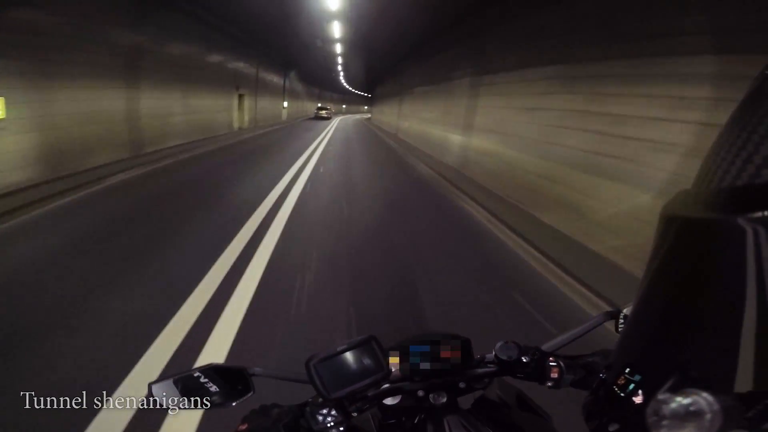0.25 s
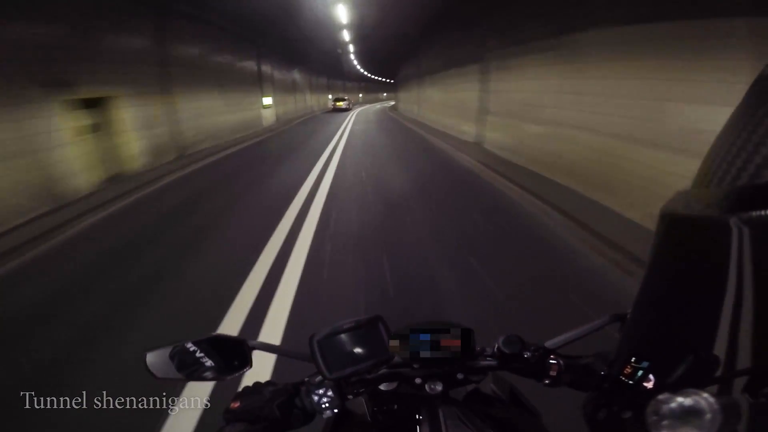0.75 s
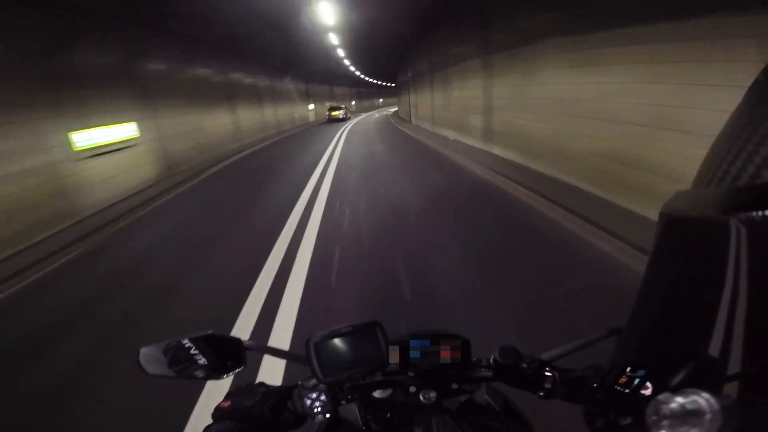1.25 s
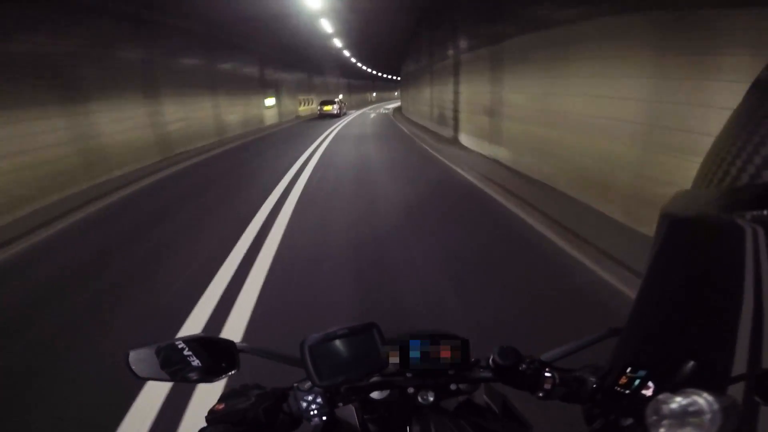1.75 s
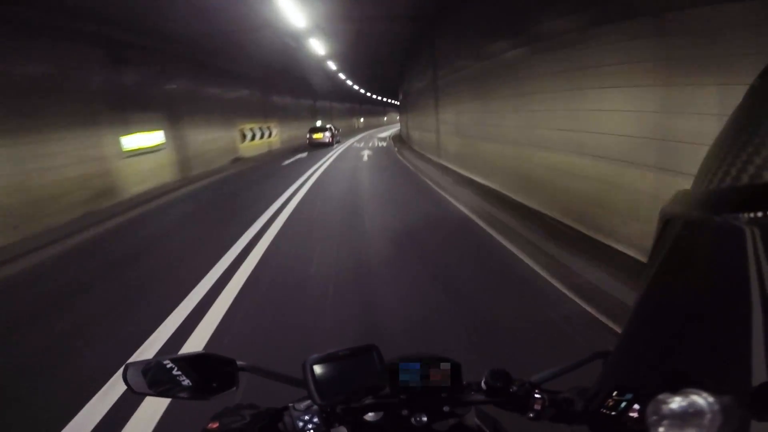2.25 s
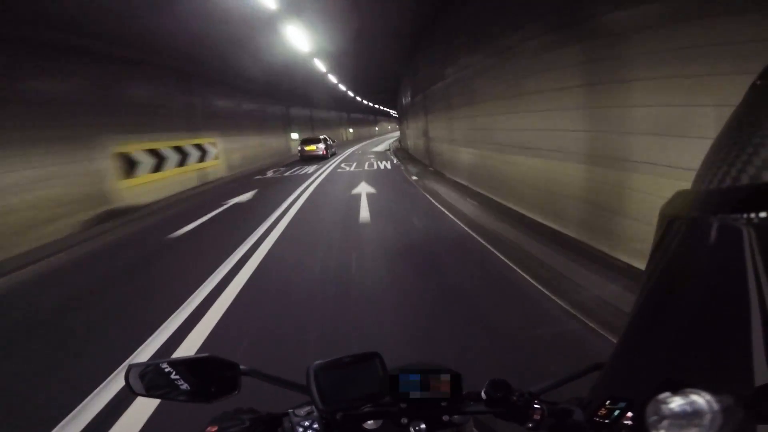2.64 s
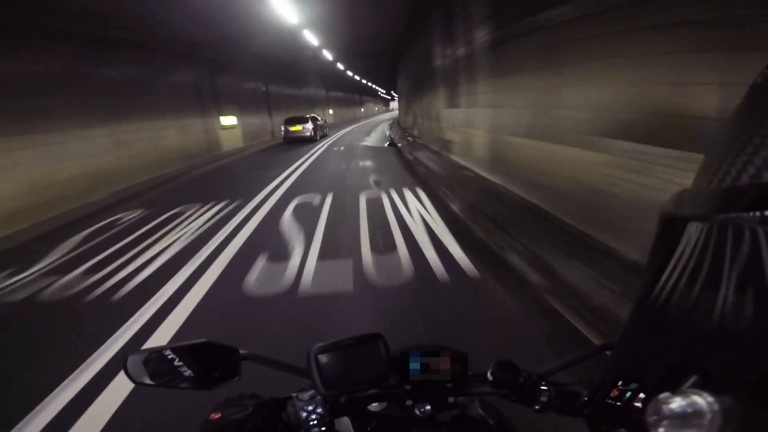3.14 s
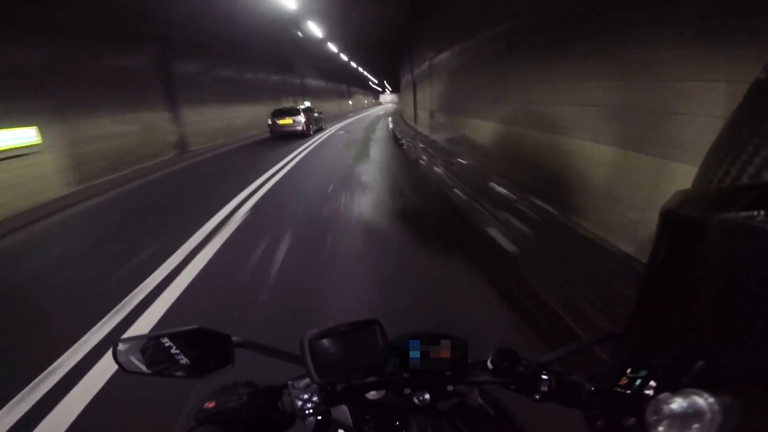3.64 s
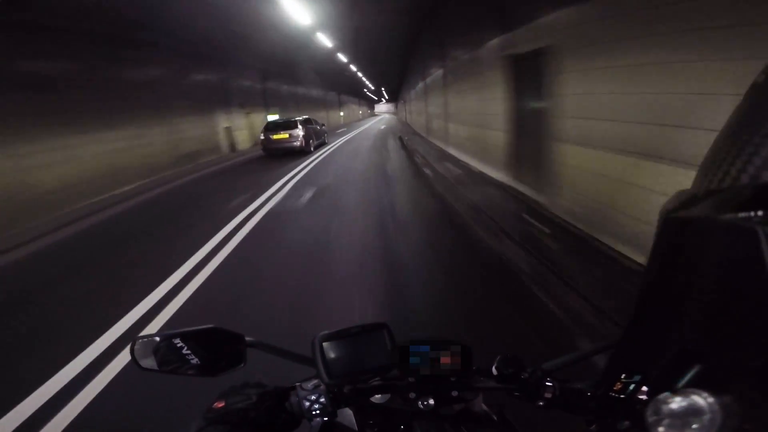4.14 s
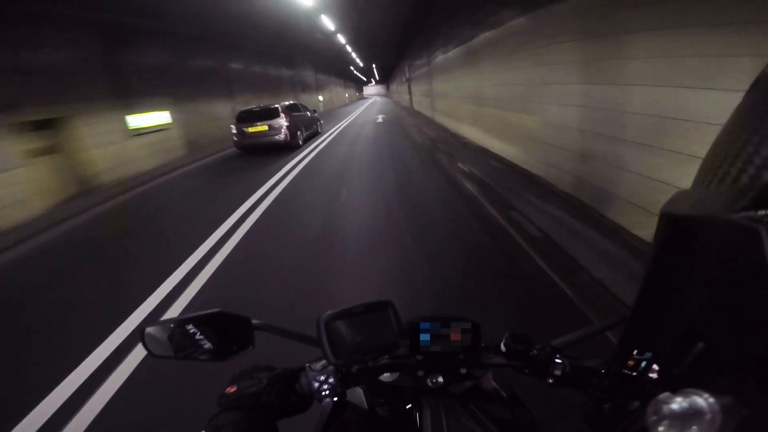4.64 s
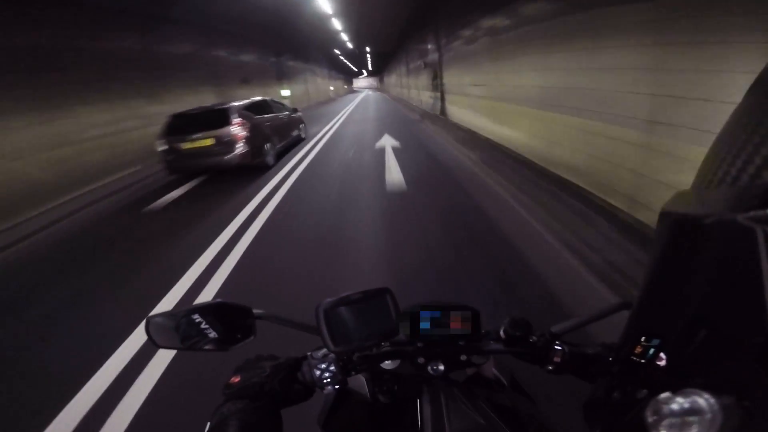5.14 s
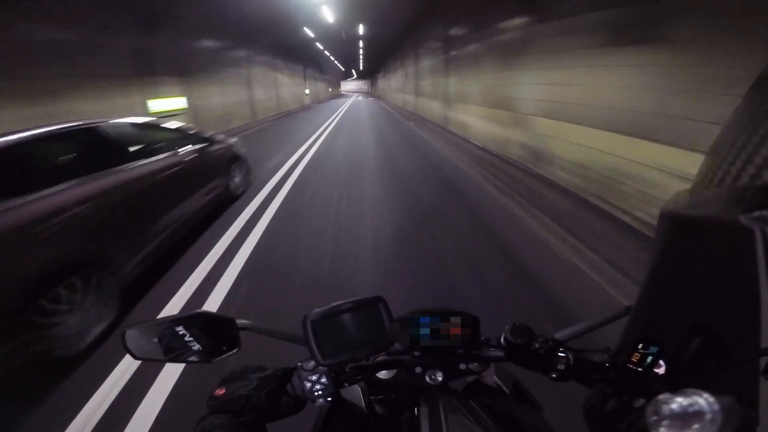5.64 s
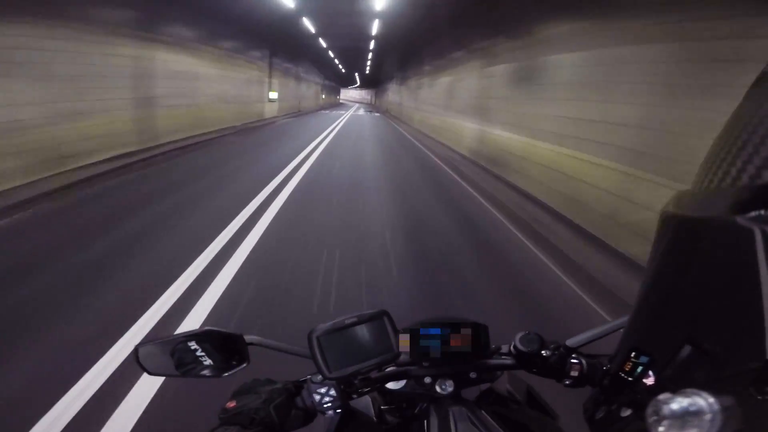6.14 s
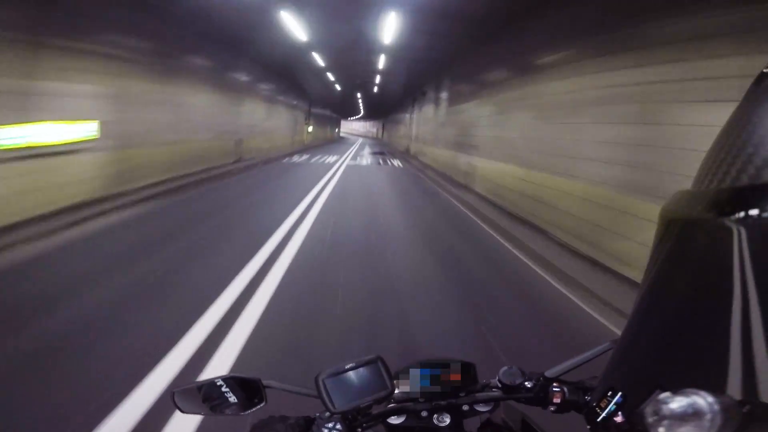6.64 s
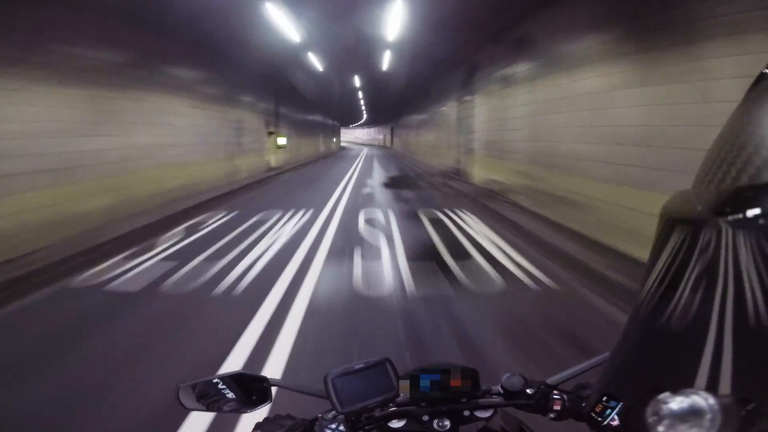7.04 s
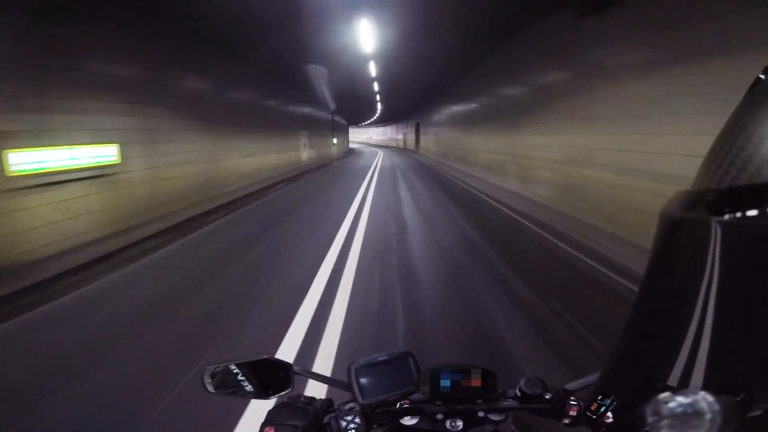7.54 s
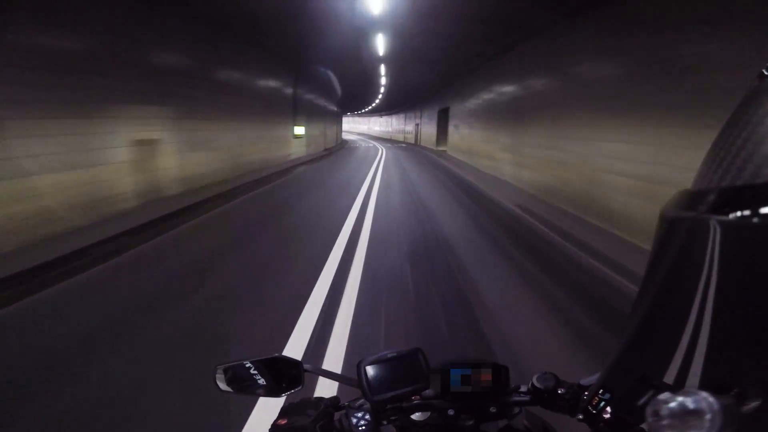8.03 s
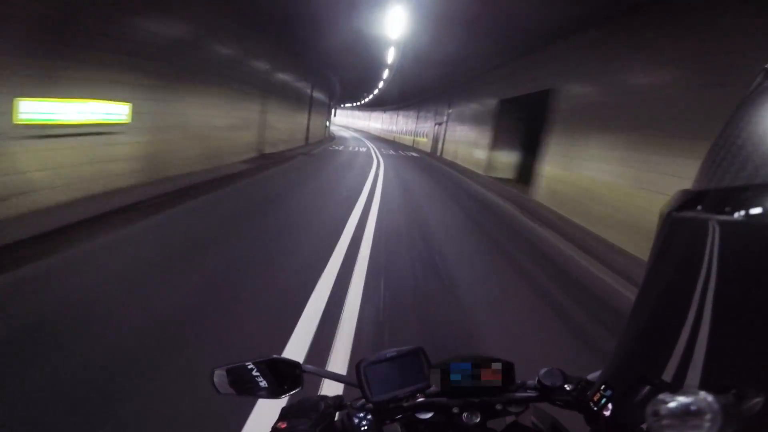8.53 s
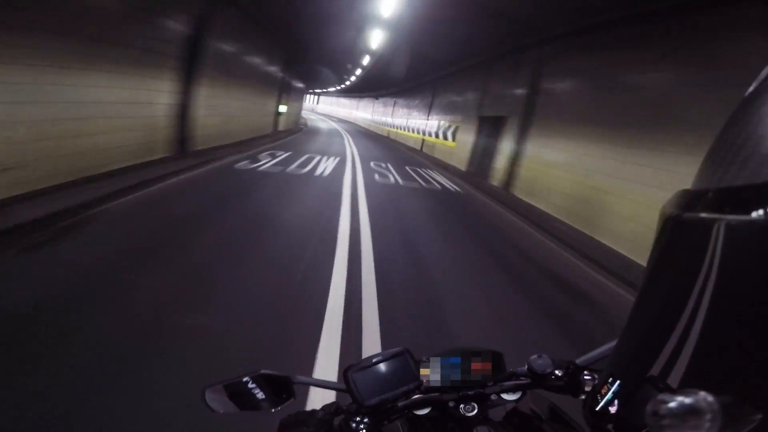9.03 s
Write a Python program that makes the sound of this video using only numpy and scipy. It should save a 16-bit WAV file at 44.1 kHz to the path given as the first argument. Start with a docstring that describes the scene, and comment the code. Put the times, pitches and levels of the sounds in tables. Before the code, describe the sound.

On-board, close stereo sound from a rider's chest in a reverberant concrete tunnel. From 0 to 1.2 s a twin-cylinder motorcycle engine drones and pulls gently, pitch rising slightly. The throttle shuts; from about 1.4 to 2.9 s it coasts lower with uneven exhaust chuffing and scattered hollow backfires, loudest near 1.7 and 2.8 s, ringing off the walls. Around 3.5 s three quick hard ticks mark the throttle reopening. The growl thickens, then from 4.6 s climbs at full throttle into a barking, raspy roar peaking near 6.1 s. It cuts abruptly to a burbling overrun, pitch sinking steadily. A heavy pop cracks at 8.1 s, then very loud, bright gear-change bangs with low thumps at 9.15-9.2 s, rough gas trailing. Lumpy wind gusts, tyre roar and hiss continue throughout, strengthening with speed.

```python
"""Motorcycle in a road tunnel

A V-twin heard from microphones at the rider's chest: it cruises, coasts, is opened up hard and coasts again.
Valve pulses timed by crank angle make the airbox bark under throttle and the exhaust burble when it is shut;
low orders drone as clean tones. Noise bursts are the backfires, a few hard firings and the gear change,
and the walls echo them. Shaped noise is the wind and the tyres; the loudest peaks drive a limiter."""
import sys
import numpy as np
from scipy import signal
from scipy.fft import rfft, irfft
from scipy.io import wavfile
from scipy.ndimage import uniform_filter1d, minimum_filter1d, map_coordinates

SR = 44100
rng = np.random.default_rng(int(sys.argv[2]) if len(sys.argv) > 2 else 0)


def materialize(psi):
    """Save the field psi as 16-bit PCM at rate SR to the path in sys.argv[1].

    A 1-D psi becomes a single channel; in a 2-D psi each row is a channel.
    """
    bounded = np.clip(np.atleast_2d(psi).T, -1, 1)
    quanta = np.round(bounded * 32767).astype(np.int16)
    wavfile.write(sys.argv[1], SR, quanta)


N = 409248
TOP_HZ = 15800  # band limit
CRUISE_HZ = 35  # cruising speed, four-stroke cycles a second

# low engine orders, counted per cycle, under each kind of load: (order, shut and slow [dB],
# shut and fast [dB], part throttle [dB], wide open and slow [dB], wide open and fast [dB])
ORDERS = [(2, -26.5, -42, -22.5, -23.5, -26.5), (3, -21, -23, -46, -38, -20.5),
          (4, -18, -13, -27.5, -24.5, -13.5), (5, -20.5, -18.5, -16, -12, -17),
          (6, -24.5, -35.5, -23.5, -23, -23), (7, -32.5, -23, -35.5, -37, -19),
          (8, -28.5, -39, -27.5, -25.5, -17.5), (9, -29, -29, -30, -23.5, -23.5),
          (10, -30.5, -29, -21, -17, -16), (11, -53, -36.5, -30.5, -32, -24),
          (12, -28.5, -30.5, -20, -19, -26), (13, -37, -31.5, -32.5, -22, -23.5),
          (14, -41, -27, -29, -32, -44)]


def amp(db):
    """Decibels to gain."""
    return 10 ** (np.asarray(db) / 20)


def unit(x):
    """Scaled to rms 1."""
    return x / np.sqrt(np.mean(x ** 2) + 1e-20)


def along(points, hz):
    """(frequency [Hz], value) points read on a log frequency axis."""
    f, v = np.transpose(points)
    return np.interp(np.log(hz + 1), np.log(f + 1), v)


def curves(rows):
    """One value per sample for each column after the time."""
    s, *cols = np.transpose(rows)
    return [np.interp(np.arange(N) / SR, s, c) for c in cols]


def wobble(rate):
    """A smooth random curve, rate knots a second."""
    knots = rng.standard_normal(int(N * rate / SR) + 4)
    return map_coordinates(knots, [np.arange(N) * rate / SR])


def coloured(x, spectrum, size=8192):
    """x through a causal minimum-phase filter with the given spectrum."""
    level_db = along(spectrum, np.fft.rfftfreq(size, 1 / SR))
    cepstrum = irfft(np.log(amp(level_db)))
    # folding the cepstrum forward makes the filter causal
    cepstrum[1:size // 2] *= 2
    cepstrum[size // 2 + 1:] = 0
    response = irfft(np.exp(rfft(cepstrum)))
    return signal.fftconvolve(np.atleast_2d(x), response[None], axes=1)[:, :np.shape(x)[-1]]


def noise(spectrum):
    """Coloured noise of rms 1."""
    return unit(coloured(rng.standard_normal(N), spectrum))


def spread(spectrum, side_db):
    """Stereo noise with a shared part and an opposed part."""
    return noise(spectrum) + amp(side_db) * noise(spectrum) * np.array([[1], [-1]])


def wind(revs, lumps_db=3.5):
    """Lumpy low noise buffets the microphones in gusts and grows with speed."""
    # the colour of the buffeting: (frequency [Hz], relative level [dB])
    buffet_colour = [(12, -24), (25, -7), (42, 1), (65, -3.5), (100, -10), (160, -18), (300, -32),
                     (1000, -70), (3000, -120)]
    # gusts and lulls: (time [s], half width [s], level over the steady buffeting [dB])
    gusts = [(.7, 0.98, 7.5), (1.651, .13, 5), (2.08, 0.028, 6), (2.45, .12, 11), (3.792, 0.093, 12),
             (5.849, .24, 3), (6.218, 0.074, 10.5), (6.558, 0.34, 11.5), (6.947, .07, 5), (7.332, 0.038, 7),
             (7.621, 0.34, 4.5), (7.862, 0.18, 2), (8.154, 0.3, 5), (8.851, 0.38, -6), (9.202, 0.048, 15)]
    steady_db, db_per_octave = -30, 3  # level at cruising speed, growth with speed
    t = np.arange(N) / SR
    gust_db = sum(db * np.exp(-((t - s) / width) ** 2) for s, width, db in gusts)
    lump_db = lumps_db * np.tanh(wobble(13.0))
    level_db = steady_db + db_per_octave * revs + gust_db + lump_db
    return amp(level_db) * spread(buffet_colour, side_db=-16)


def tyres(revs):
    """Tyres on the road make a low roar and a steady hiss, both growing with speed."""
    # the low roar: (frequency [Hz], relative level [dB])
    roar_colour = [(15, -10), (45, 19), (100, 24), (200, 26), (400, 23), (900, 12), (1400, 1), (3000, -30)]
    # the hiss: (frequency [Hz], relative level [dB])
    hiss_colour = [(400, -22), (1000, 9), (1400, 6.5), (2500, -1.5), (3500, -6.5), (5200, -3.5),
                   (6500, -6.5), (8500, -8), (11000, -15), (15500, -33)]
    roar = amp(-25.0 + 9 * revs) * spread(roar_colour, side_db=-2)  # 9 dB per octave of speed
    hiss_db = -40.5 + 18.2 * revs + 0.29 * wobble(21)
    return roar + amp(hiss_db) * spread(hiss_colour, side_db=-9.5)


def tunnel(x, tail_db=-11.0, dull_hz=7500):
    """Each side hears its own dulled near reflections, then the long wash of the concrete tube."""
    # how long the tube rings: (frequency [Hz], t60 [s])
    ring_time = [(150, 1.3), (1000, 7.1), (4000, 4.1), (12000, 0.16)]
    # near reflections from tank, rider, road and walls:
    # (delay [ms], relative left gain [ratio], relative right gain [ratio])
    reflections = [(.35, -0.002, -0.07), (1.9, 0.086, -0.06), (2.9, -0.15, 0.29), (4.6, -0.22, 0.36),
                   (6.2, 0.48, -0.5), (19, 0.038, -0.0096)]
    # one second of noise, each band dying at its own rate
    hz, t, z = signal.stft(rng.standard_normal((2, SR)), SR, nperseg=256)
    decay = amp(-60 * t / along(ring_time, hz)[:, None])
    tails = signal.istft(z * decay, SR, nperseg=256)[1]
    near = np.zeros(tails.shape)
    for ms, left, right in reflections:
        near[:, round(ms * SR / 1000)] += [left, right]
    strength = np.sqrt(1 + np.sum(near[0] ** 2))
    near = signal.filtfilt(*signal.butter(2, min(dull_hz, TOP_HZ), fs=SR), near, padlen=0)
    near[:, 0] += 1  # the direct sound
    response = near / strength + amp(tail_db) * tails / np.linalg.norm(tails[0])
    return signal.fftconvolve(x, response, axes=1)[:, :N]


def drifting_wall(x, delay_ms=8.5, drift_ms=0.46, echo_db=-13):
    """The wall slides nearer and farther, so its dull echo lifts and hollows one order after another."""
    drift = np.array([wobble(1.6), wobble(1.6)])  # each side drifts on its own
    delay = (delay_ms + drift_ms * drift) * SR / 1000
    dull = signal.sosfilt(signal.butter(2, 1200, fs=SR, output="sos"), x)
    samples = np.arange(N)
    echo = np.array([np.interp(samples - d, samples, side) for d, side in zip(delay, dull)])
    return x + amp(echo_db) * echo


def blast(t, spectrum, bright_hz=TOP_HZ, life=.0008, puff=.13):
    """A steep pressure front with a short burst of gas behind it, peak 1."""
    gas = puff * np.exp(-t / life) * rng.standard_normal(len(t))
    front = gas - (t == 0)
    softened = signal.lfilter(*signal.butter(1, bright_hz, fs=SR), front)
    crack = coloured(softened, spectrum)[0]
    return crack / np.abs(crack).max()


def pipe_knocks():
    """Backfires pop in the pipe, and three hard firings of one cylinder tick as the throttle opens;
    each knocks on the pipe's resonances."""
    # backfires, and the three firings near 3.5 s, before the tunnel's echoes: (time [s], peak level [dB])
    knocks = [(1.449, -11), (1.535, -13), (1.5638, -23), (1.695, -1.5), (1.736, -17), (1.795, -12),
              (1.824, -14), (1.913, -9), (1.9718, -16), (2.179, -31), (2.332, -24), (2.514, -22),
              (2.561, -10.5), (2.635, -15), (2.8381, -6), (3.505, -16), (3.539, -18), (3.570, -19),
              (8.127, -2.5)]
    # their hollow knock: (frequency [Hz], relative level [dB])
    knock_colour = [(150, -10), (400, -9), (580, -5), (700, 3), (850, 1.5), (1000, -2.5), (1250, -10),
                    (1750, -15), (2300, -24), (3500, -26), (6000, -28), (9000, -39), (15000, -55)]
    out, t = np.zeros(N + SR), np.arange(SR // 20) / SR
    for s, db in knocks:
        out[round(s * SR):][:len(t)] += amp(db) * blast(t, knock_colour)
    return out[:N]


def gearshift(thump_s=.003, tumble_db=-25, tumble_s=.15):
    """A gear change makes sharp bangs, each with a decaying low thump; rough gas tumbles out after the last."""
    # (time [s], crack peak level [dB], bright up to [Hz], thump starting level [dB], thump pitch [Hz])
    bangs = [(9.1448, 1.5, 800, -1, 366), (9.157, -8, 400, -12, 170), (9.1849, 7.5, 5000, -0.5, 220),
             (9.212, -13, 500, -18, 260)]
    # the crack: (frequency [Hz], relative level [dB])
    crack_colour = [(150, -21), (500, -22), (800, -1), (1100, 5), (1500, 3), (2600, -1), (3000, -7),
                    (3600, -1), (5500, -7), (8000, -6), (10000, -13), (15000, -46)]
    # the gas that tumbles out: (frequency [Hz], relative level [dB])
    tumble_colour = [(60, -18), (250, 8), (700, -5), (1400, -14), (2500, -23), (6000, -23), (15000, -34)]
    out, t = np.zeros(N + SR), np.arange(SR // 20) / SR
    for s, db, bright_hz, thump_db, thump_hz in bangs:
        knock = np.exp(-t / thump_s) * np.sin(2 * np.pi * thump_hz * t)
        crack = amp(db) * blast(t, crack_colour, bright_hz)
        out[round(s * SR):][:len(t)] += crack - amp(thump_db) * knock
    since = np.arange(N) / SR - bangs[-1][0]
    fade = (since > 0) * np.exp(-np.abs(since) / tumble_s)
    tumble = fade * amp(tumble_db + 3.4 * wobble(120))
    return out[:N] + tumble * noise(tumble_colour)


def boom(angle, throttle, speed, waver_db=1, stumble_db=1.0, dispersion=1.3, loaded=0.43):
    """Low orders drone as clean tones whose balance follows throttle and speed; slow coasting stumbles."""
    # what counts as slow and as fast, shut and wide open: (slow [cycles/s], fast [cycles/s])
    shut_range = (34.47, 37.43)
    wide_range = (34.6, 44.8)
    # the silencer's colour on the orders: (frequency [Hz], gain [dB])
    silencer = [(60, 0), (105, -0.5), (126, -1), (140, 0.5), (157, 1.5), (178, -2.5), (220, 1.5),
                (240, -1.5), (264, 2), (288, -0.5), (320, -2), (415, -2), (600, -1)]
    # stereo width, before it wavers: (frequency [Hz], side over mid [dB])
    width = [(65, -19), (160, -6), (280, -2.5), (500, -2)]
    # the drone swells and sways between the walls: (time [s], level [dB], left over right [dB])
    standing = [(0, -1.5, -2), (.82, -1, -3.5), (1.3, -1.5, -1), (1.7, -1.5, 0.5), (2.09, -1, 2),
                (2.64, -4.5, -2), (3.2, -5.5, -2), (3.5, -5, -2), (3.8, -4.5, -3), (4.2, -1.5, -2.5),
                (4.57, -2.5, -3), (5.25, -3, -0.5), (6.4, 0.5, -1), (7.49, 0, 0.5), (7.98, -3, -4),
                (9.17, 0, 0.5), (9.28, -5, 1.5)]
    out = np.zeros((2, N))
    load, wide = np.clip(throttle / loaded, 0, 1), np.clip((throttle - .5) * 2, 0, 1)
    for order, shut_slow, shut_fast, part, wide_slow, wide_fast in ORDERS:
        k = round(order)
        wide_db = np.interp(speed, wide_range, [wide_slow, wide_fast])
        open_db = (1 - wide) * part + wide * wide_db
        shut_db = np.interp(speed, shut_range, [shut_slow, shut_fast])
        # the silencer delays each order differently, evening out the throb
        smear = dispersion * (k - 5) ** 2 - 2 * np.pi * k * .38
        # the upper orders line up with the intake strokes or the exhaust beat
        beats = np.exp(-2j * np.pi * k * np.array([.385, .785])).sum()
        strokes = smear if k < 8 else np.angle(beats)
        blowdown = smear if k < 10 else np.pi - 2 * np.pi * k * .02
        open_gain = load * amp(open_db) * np.exp(1j * strokes)
        shut_gain = (1 - load) * amp(shut_db) * np.exp(1j * blowdown)
        colour = amp(along(silencer, k * speed))
        tone = (open_gain + shut_gain) * colour * np.exp(2j * np.pi * k * angle)
        mid = -amp(waver_db * k / 5 * np.tanh(wobble(5.4))) * tone.real
        side = amp(along(width, k * speed)) * (0.88 + 0.53 * wobble(1.406)) * tone.imag
        out += np.sqrt(2) * np.array([mid + side, mid - side])
    slowness = (CRUISE_HZ / speed) ** 4
    stumble = amp(stumble_db * (2.0 - load) * slowness * np.tanh(wobble(28)))
    level_db, pan_db = curves(standing)
    return out * stumble * amp(level_db + pan_db * np.array([[.5], [-.5]]))


def firings(angle, first, second, second_db, scatter_db, jitter_ms):
    """Two uneven pulses a cycle, one for each cylinder, no two quite alike; lags are in cycles."""
    cycles, samples = np.arange(int(angle[-1]) + 1), np.arange(N)
    at = [np.interp(cycles, angle - lag, samples, left=-SR, right=-SR) for lag in (first, second)]
    at = np.transpose(at)
    at = at + jitter_ms * SR / 1000 * rng.standard_normal(at.shape)
    # balance and scatter may change over time
    excess = np.interp(at, samples, second_db + np.zeros(N))
    scatter = np.interp(at, samples, scatter_db + np.zeros(N))
    strength = amp(excess * [-.5, .5] + scatter * rng.standard_normal(at.shape))
    inside = (at >= 0) & (at < N - 1)
    return unit(np.bincount(np.round(at[inside]).astype(int), strength[inside], N))


def valve_shaped(pulses, spectrum, angle):
    """A valve stays open for a fixed crank angle, so the pulse's colour climbs with engine speed."""
    clock = angle / CRUISE_HZ * SR  # samples at a steady cruising speed
    smooth = signal.sosfiltfilt(signal.butter(2, 4000, fs=SR, output="sos"), pulses)
    steady = np.interp(np.arange(clock[-1]), clock, smooth)
    shaped = coloured(steady, spectrum)[0]
    # only the part above the low orders is kept
    cut_hz = (len(ORDERS) + 1.3) * CRUISE_HZ
    upper = signal.sosfiltfilt(signal.butter(10, cut_hz, "high", fs=SR, output="sos"), shaped)
    return unit(np.interp(clock, np.arange(len(upper)), upper))


def gas_rush(pulses, life, between, shared):
    """Turbulence that flares at each pulse and never quite stops; it differs at the two microphones."""
    flare = unit(signal.lfilter([1], [1, -np.exp(-1 / (life * SR))], np.abs(pulses)))
    hiss = rng.standard_normal((2, N)) + shared * rng.standard_normal(N)
    return unit((flare + between) * hiss)


def effort(law, throttle, revs):
    """Gain of a layer: it follows the throttle and the engine speed (revs, in octaves over cruising)."""
    levelling = 1  # how quickly the coasting exhaust stops growing with speed, per octave
    shut, half, wide, shut_slope, wide_slope = law
    shut_growth_db = (1 - throttle) * shut_slope * (revs - levelling * revs ** 2)
    growth_db = shut_growth_db + throttle * wide_slope * revs
    return amp(np.interp(throttle, [0, .5, 1], [shut, half, wide]) + growth_db)


def chuff(angle, first, second, drawn):
    """On the overrun the exhaust chuffs, one cylinder far stronger than the other."""
    # level on a shut throttle: (time [s], level [dB])
    chuff_level = [(1.2, -45), (1.45, -30.5), (2, -30), (2.8, -37.5), (3.3, -33), (6.3, -40), (7.3, -33),
                   (8.2, -23), (9.28, -31.5)]
    # its hollow colour: (frequency [Hz], relative level [dB])
    hollow = [(100, -16.5), (300, -8.5), (450, 0.5), (700, 3), (850, 0.5), (1000, -2), (1300, -14),
              (1750, -10.5), (2400, -25.5), (5000, -33), (15000, -64)]
    beats = firings(angle, first, second, 10, scatter_db=.6, jitter_ms=.02)
    return amp(curves(chuff_level)[0]) * (1 - drawn) * unit(coloured(beats, hollow))


def rasp(pulses):
    """Bright gas noise, almost the same at both microphones, flares with each pulse."""
    # (frequency [Hz], relative level [dB])
    rasp_colour = [(900, -3), (2000, 7), (3000, 4.5), (4000, 1.5), (5100, 2), (6500, -3.5), (8500, -6),
                   (11000, -12.5), (15500, -19)]
    return unit(coloured(gas_rush(pulses, life=.0015, between=.38, shared=5), rasp_colour))


def bark(pulses, drawn):
    """Pulses and their turbulence bark under throttle and spit dully when it is shut."""
    # under throttle: (frequency [Hz], relative level [dB])
    bark_colour = [(500, -30), (1000, 13), (1350, 11.5), (1750, 12.5), (2300, 5), (2800, 3), (3200, -4),
                   (4500, -2), (6000, -10), (9000, -30), (15500, -55)]
    # the dull spit of the exhaust: (frequency [Hz], relative level [dB])
    spit_colour = [(450, -28), (700, 0.5), (1000, 14.5), (1350, 17), (1750, 10), (2300, 6), (2800, -3.5),
                   (3300, -13), (4800, -2.5), (6500, -13), (9000, -34), (15500, -51)]
    puffs = pulses + .22 * gas_rush(pulses, life=.0012, between=0.05, shared=0.7)
    open_bark = drawn * unit(coloured(puffs, bark_colour))
    return open_bark + (1 - drawn) * unit(coloured(puffs, spit_colour))


def thump(intake, gulps, exhaust, angle, throttle):
    """Intake honk and exhaust beat ring fixed resonances; pulses steepen as the butterfly opens fully."""
    # pulse colours at cruising speed, rising and falling with the engine, for part-throttle intake,
    # full-throttle intake and exhaust: (frequency [Hz], relative level [dB])
    airbox = [(480, 1.5), (540, 11), (600, -2.5), (690, -5.5), (790, -2.5), (880, -15), (1010, -7.5),
              (1100, -20), (1250, -20), (1600, -24.5), (4000, -52.5)]
    wide_open = [(480, 1.5), (580, 7), (680, 5.5), (800, 6), (900, 1.5), (1030, -3), (1200, -6),
                 (1700, -28.5), (4000, -42)]
    pipe = [(480, 1), (570, -0.5), (620, -2.5), (720, -3), (800, -5), (880, -3.5), (970, -6), (1100, -15),
            (1300, -24), (1750, -41.5), (4000, -50)]
    # resonances of airbox and pipe that stay put: (frequency [Hz], relative level [dB])
    airbox_body = [(440, 2), (480, -2), (535, 1), (600, 1), (680, 1), (780, 4.5), (860, 0), (925, 2.5),
                   (1000, 3.5), (1100, 2.5)]
    pipe_body = [(500, 1), (590, 1), (680, 0), (750, 2), (850, -3), (960, -2), (1100, -2.5), (1300, 0.2)]
    steep = np.clip((throttle - .5) * 2, 0, 1)
    soft_honk = (1 - steep) * valve_shaped(intake, airbox, angle)
    honk = soft_honk + steep * valve_shaped(gulps, wide_open, angle)
    beat = coloured(valve_shaped(exhaust, pipe, angle), pipe_body)
    return unit(coloured(honk, airbox_body)) - amp(4.5) * unit(beat)


def engine(angle, throttle, revs):
    """Intake pulses take over from exhaust pulses as the throttle opens; both end in a noisy rasp."""
    # how unevenly the exhaust beats: (time [s], first pulse [cycles], second pulse [cycles],
    # second over first [dB])
    uneven = [(0, .6, .93, -1), (1.2, .55, .93, 2), (1.45, .63, .97, 7), (2.9, .65, .975, 8),
              (3.25, .65, 1.0, -7), (3.5, .55, 1.0, -11), (4.2, .59, .95, 0), (6.3, .6, 1.02, 1),
              (6.8, .6, 1.02, 4), (7.5, .595, 1.03, 6), (8.3, .565, 1.0, 0), (9.28, .57, .99, 4)]
    # which cylinder draws harder, and which honks louder at full throttle:
    # (engine speed [cycles/s], second over first [dB])
    intake_balance = [(35, 1), (38, 6), (42, -4.5), (48, -8.5)]
    honk_balance = [(33.5, 1), (36, -5.5), (42, 1), (48, -7)]
    # layer strength at cruising speed and its growth: (shut [dB], half open [dB], wide open [dB],
    # growth shut [dB per octave], growth wide open [dB per octave])
    thump_law = (-33, -29, -20, 10.5, -18)
    bark_law = (-38.5, -39, -23, 44, 11)
    rasp_law = (-40, -43, -31, 18, 27)
    drawn = np.clip(throttle * 1.5, 0, 1)  # share of the intake
    first, second, second_db = curves(uneven)
    speed = CRUISE_HZ * 2 ** revs
    strokes = .355 + .016 * throttle, .755 + .06 * revs  # the two intake strokes, in cycles
    draw_db, honk_db = along(intake_balance, speed), along(honk_balance, speed)
    intake = np.sqrt(drawn) * firings(angle, *strokes, draw_db, scatter_db=.6, jitter_ms=.012)
    gulps = firings(angle, *strokes, honk_db, scatter_db=.5, jitter_ms=.012)
    exhaust = firings(angle, first, second, second_db, scatter_db=.7, jitter_ms=.02)
    burble = amp(2.9 * np.tanh(wobble(7)))  # swells and slackens
    exhaust = np.sqrt(1 - drawn) * exhaust * burble
    pulses = unit(intake - exhaust)
    out = chuff(angle, first, second, drawn)
    out = out + effort(rasp_law, throttle, revs) * rasp(pulses)
    out = out - effort(thump_law, throttle, revs) * thump(intake, gulps, exhaust, angle, throttle)
    return out - effort(bark_law, throttle, revs) * bark(pulses, drawn)


def scene():
    """Crank angle, speed and throttle drive the engine; wind and tyres follow its speed."""
    # (time [s], engine speed [four-stroke cycles/s])
    engine_speed = [(0, 32.95), (.4, 33.68), (1.1, 35.87), (1.27, 34.61), (1.4, 35.22), (2, 33.78),
                    (3.2, 31.36), (3.8, 31.18), (4.3, 32.63), (4.8, 35.72), (5.3, 39.92), (6.08, 48.56),
                    (6.22, 46.21), (6.42, 46.83), (7.3, 42.83), (7.95, 38.97), (8.7, 36.57), (9.28, 35.25)]
    # the rider's hand: (time [s], throttle opening [0-1])
    hand = [(0, 0.38), (.7, 0.61), (1.08, 0.41), (1.24, 0), (3.22, 0), (3.42, 0.24), (3.8, 0.64),
            (4.25, 0.65), (4.6, 1), (6.12, 0.95), (6.2, 0.03), (9.28, 0)]
    speed, = curves(engine_speed)
    angle, revs = np.cumsum(speed) / SR, np.log2(speed / CRUISE_HZ)  # cycles, octaves over cruising
    throttle = np.clip(curves(hand)[0], 0, 1)
    air = wind(revs) + tyres(revs)
    drone = boom(angle, throttle, speed)
    bangs = pipe_knocks() + gearshift()
    machine = drifting_wall(engine(angle, throttle, revs))
    return tunnel(machine + bangs) + drone + air


def record(dry, ceiling=1.4, knee=8, size=41):
    """A fast limiter catches peaks, what slips through rounds off at full scale, then the band is cut."""
    needed = np.minimum(1, ceiling / (np.abs(dry).max(0) + 1e-9))
    limited = dry * uniform_filter1d(minimum_filter1d(needed, size), size)  # size in samples
    squashed = limited / (1 + np.abs(limited) ** knee) ** (1 / knee)
    return irfft(rfft(squashed) * (np.fft.rfftfreq(N, 1 / SR) < TOP_HZ), N)


dry = scene()
out = record(dry)
materialize(out)
```